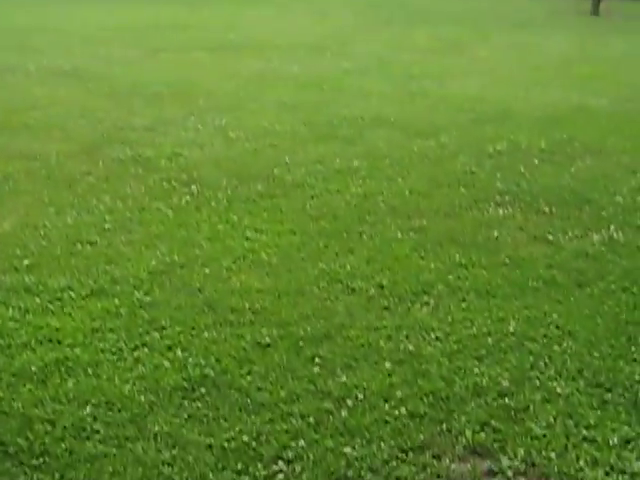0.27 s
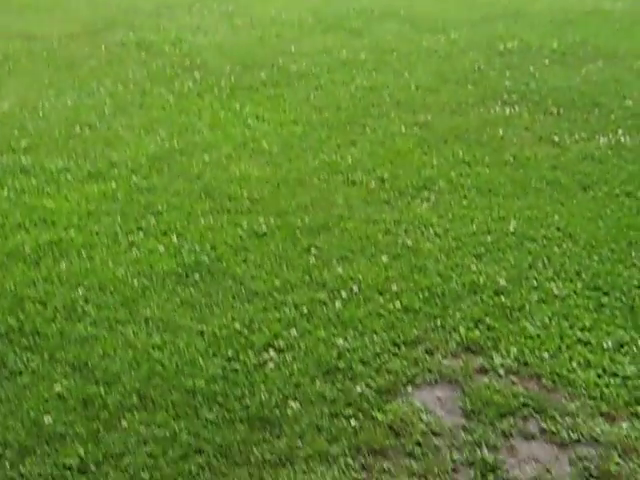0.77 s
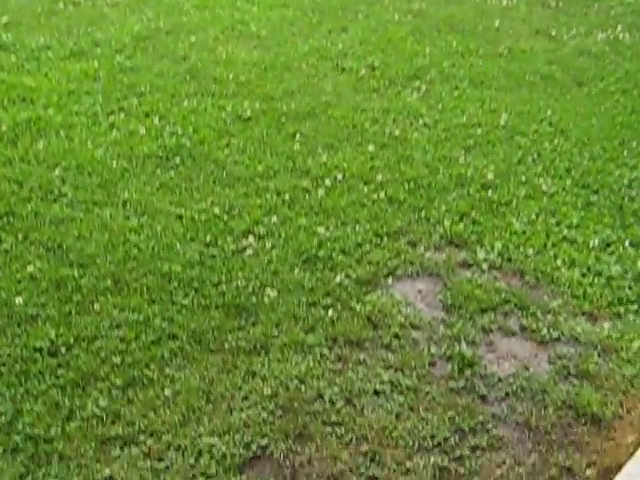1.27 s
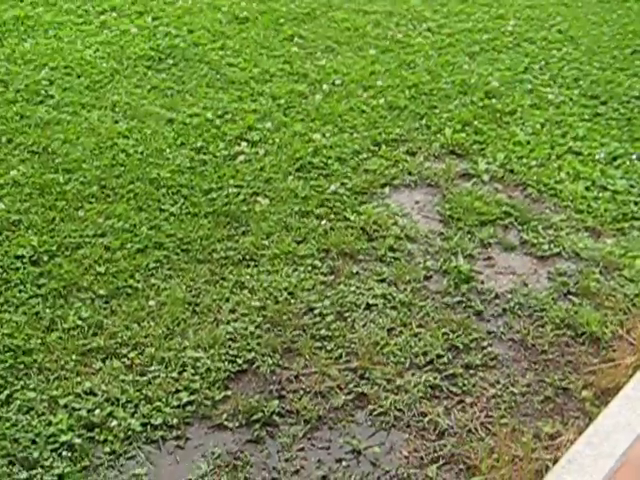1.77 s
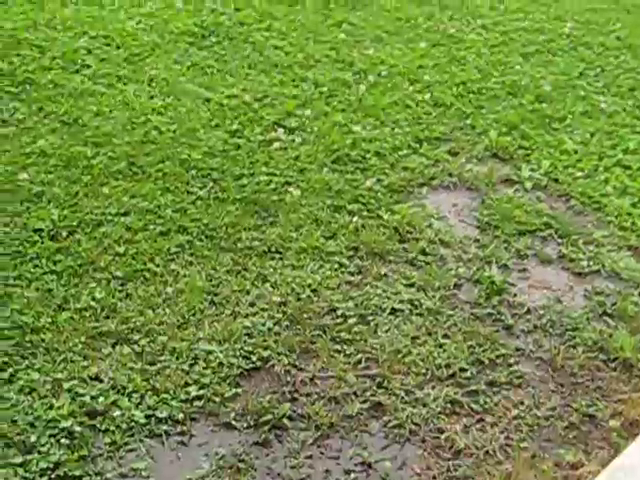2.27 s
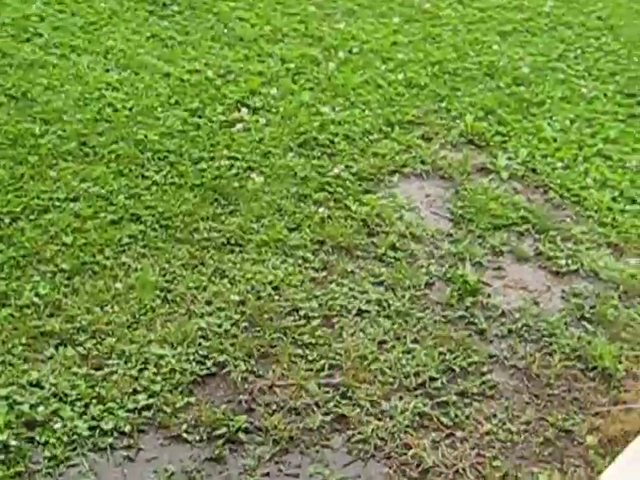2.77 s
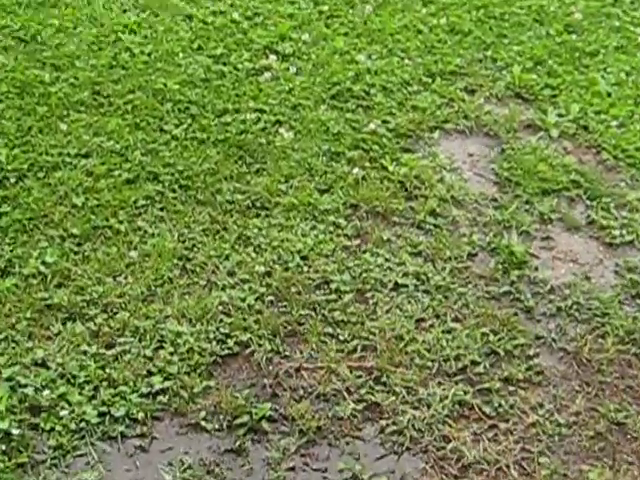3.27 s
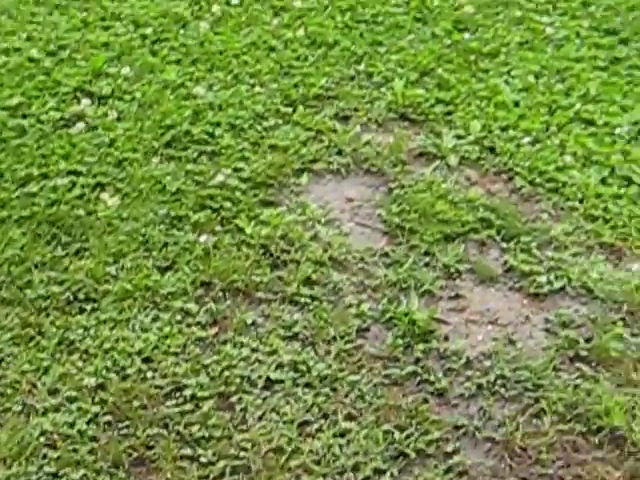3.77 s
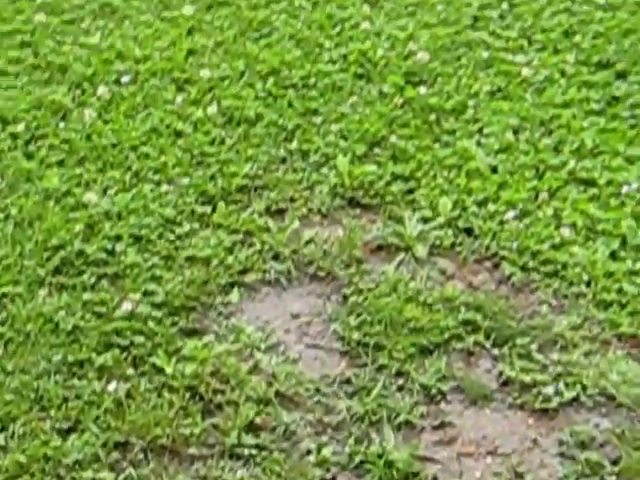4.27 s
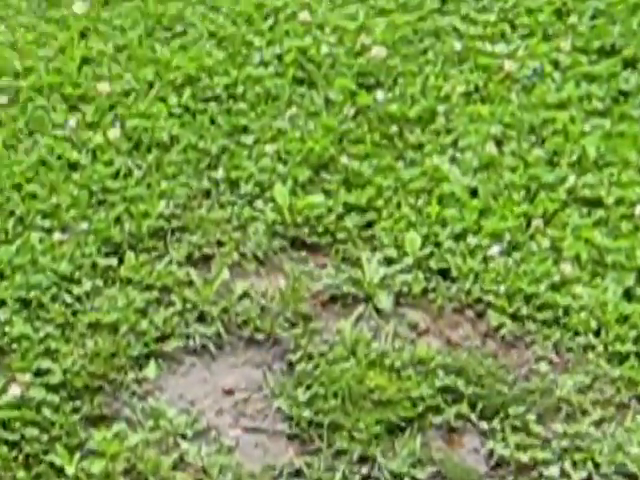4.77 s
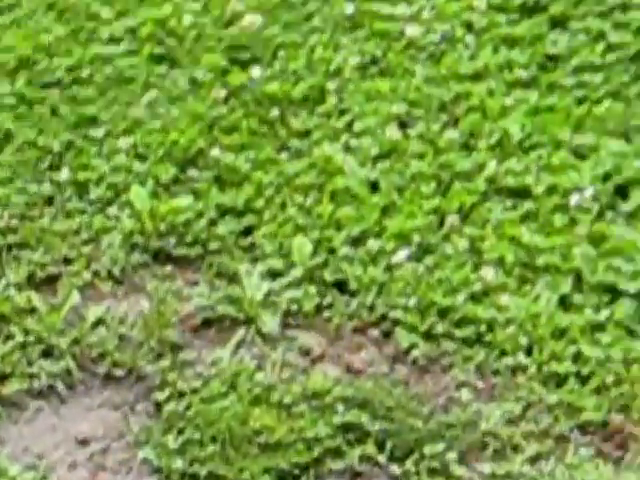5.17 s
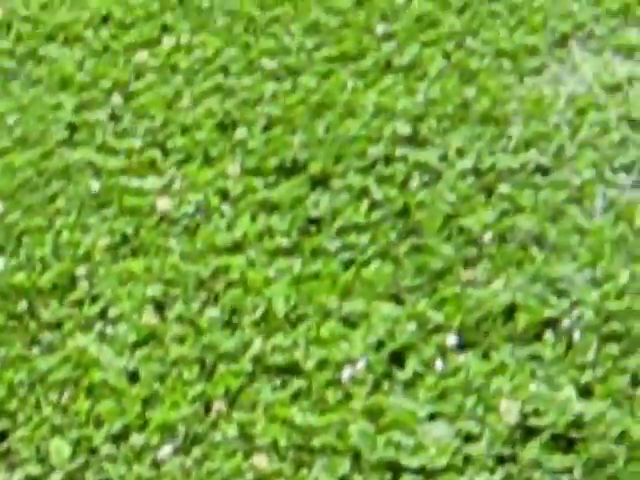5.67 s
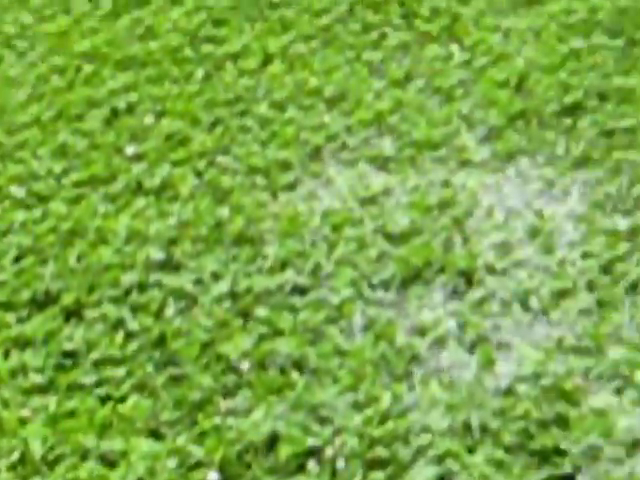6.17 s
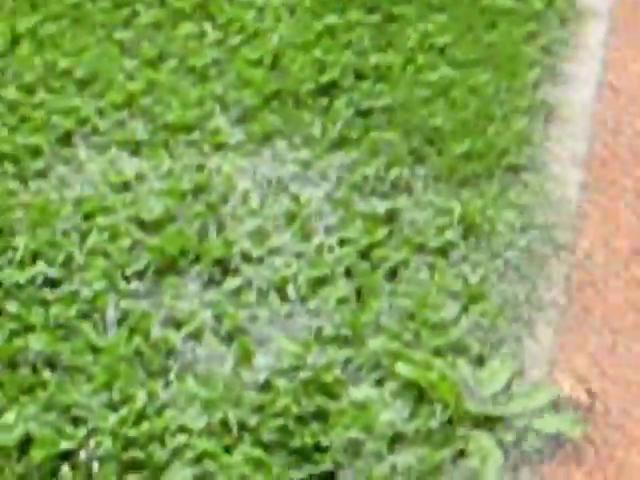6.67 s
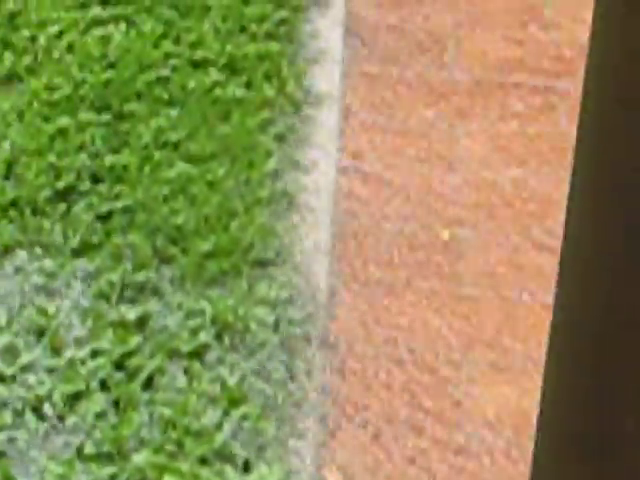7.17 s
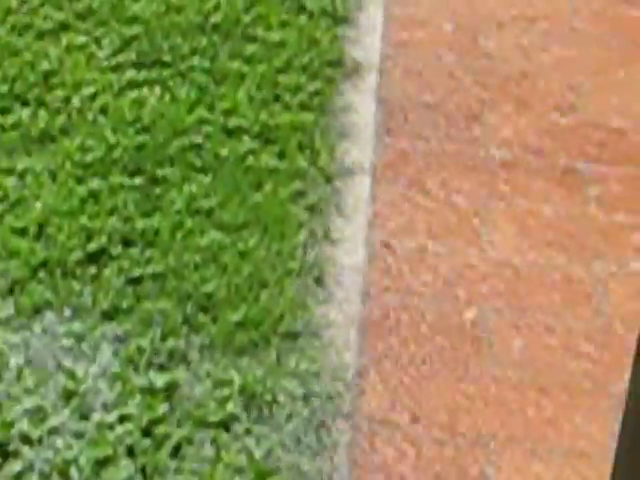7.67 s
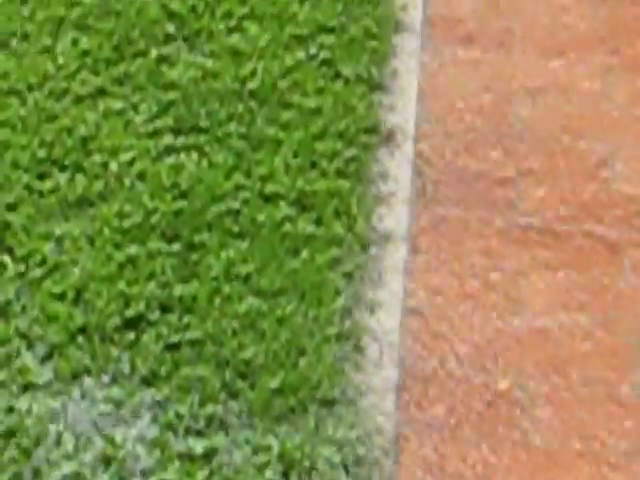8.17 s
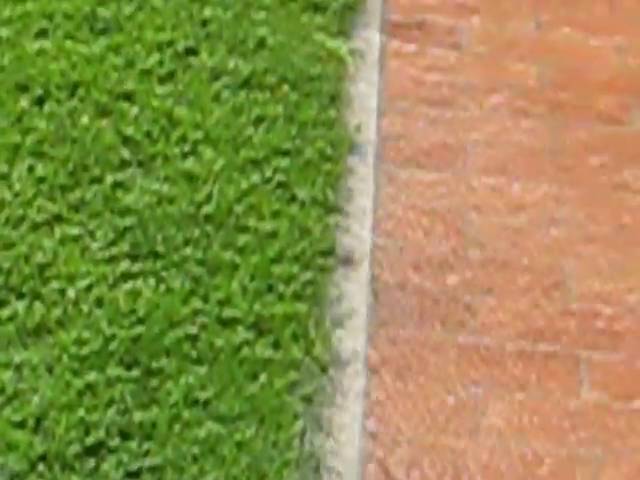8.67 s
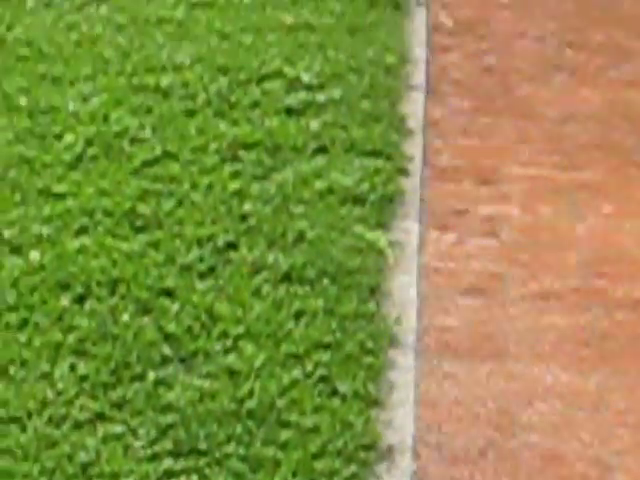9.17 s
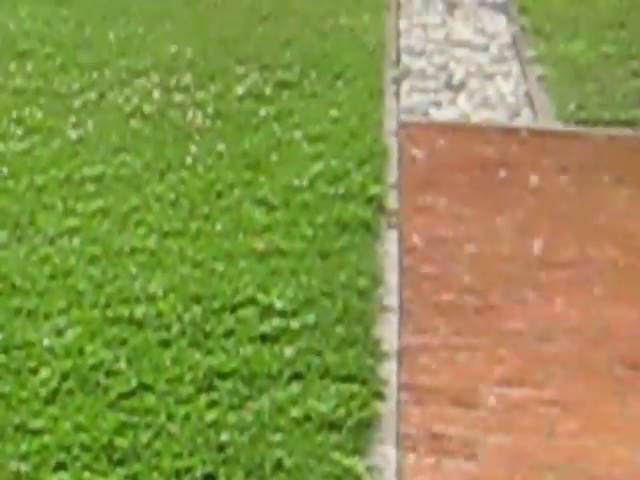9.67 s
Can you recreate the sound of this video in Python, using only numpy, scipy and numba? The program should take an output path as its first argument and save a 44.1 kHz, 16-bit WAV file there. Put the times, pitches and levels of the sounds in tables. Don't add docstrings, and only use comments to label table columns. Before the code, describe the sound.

A shower falls on a garden lawn and brick paving, heard from shelter by a small, practically mono camera microphone. Rain hiss stays continuous, gently flickering. Over it a bird repeats short, piercing chirps in runs with pauses, while scattered fat drops smack and ring and shaken leaves spit brief sprays. Near the start, sound blinks out around a small click; later, bright splashes become more frequent, with faint flickers of sideways noise.

```python
import sys
import numpy as np
from scipy import signal
from scipy.fft import rfft, irfft, next_fast_len
from scipy.io import wavfile
from scipy.ndimage import uniform_filter1d
from numba import njit

SR = 44100
rng = np.random.default_rng(int(sys.argv[2]) if len(sys.argv) > 2 else 0)


def level_to_linear(level):
    exponent = np.asarray(level, float) / 20
    return 10 ** exponent


def store_pcm(level_fs):
    pcm = np.round(np.clip(level_fs, -1, 1) * 32767).astype(np.int16)
    wavfile.write(sys.argv[1], SR, np.atleast_2d(pcm).T)


N = 437913
FFT_SIZE = next_fast_len(N)
HZ = np.arange(FFT_SIZE // 2 + 1) * SR / FFT_SIZE
TOP_HZ = 15830


def unit(x):
    return x / np.sqrt(np.mean(x ** 2))


def walk(rate_hz):
    hold = int(SR / rate_hz)
    steps = np.repeat(rng.standard_normal(N // hold + 1), hold)
    return 1.28 * uniform_filter1d(uniform_filter1d(steps, hold), hold)[:N]


def bump(centre_hz, octaves):
    return np.cos(np.pi / 2 * np.clip(np.log2((HZ + 1) / centre_hz) / octaves, -1, 1)) ** 2


def band_noise(spectrum, centre_hz, octaves):
    return irfft(spectrum * bump(centre_hz, octaves), FFT_SIZE)[:N]


def colour(hz):
    # frequency [Hz], density [dB per Hz].
    wash_shape = [(30, -29), (300, -19), (800, -14.5), (1050, -12.5), (1600, -13.5), (2150, -11.5),
                  (2850, -14), (3900, -10.5), (5300, -12), (6600, -14.5), (10000, -16), (12000, -20),
                  (14000, -27.5), (15800, -35.5)]
    shape_hz, shape_db = np.transpose(wash_shape)
    return level_to_linear(np.interp(np.log(hz + 1), np.log(shape_hz), shape_db))


@njit
def rings(at, size, hz, cycles, phase, n, sr):
    out = np.zeros(n)
    for k in range(len(at)):
        step = np.exp(complex(-np.log(1000.) / cycles[k], 2 * np.pi) * hz[k] / sr)
        z = size[k] * np.exp(1j * phase[k])
        rise = 1.
        for i in range(at[k], min(n, at[k] + int(cycles[k] * sr / hz[k]))):
            z *= step
            rise *= np.exp(-2 * hz[k] / sr)
            out[i] += (1 - rise) * z.imag
    return out


def ring_clusters(table, spread=.1, lag_cycles=.15):
    s, db, hz, cycles = np.repeat(np.array(table, float), 3, axis=0).T
    late, detune, phase = rng.random((len(s), 3)).T
    at = ((s + lag_cycles * late / hz) * SR).astype(np.int64)
    hz = np.clip(hz * (1 + spread * (2 * detune - 1)), 300, 17000)
    return rings(at, level_to_linear(db - 4), hz, np.clip(cycles, 1, 60) * 2, phase, N, 1. * SR)


def bird():
    # start [s], top of the loud partial [Hz], slide [s], level [dB], upper partial [dB].
    calls = [(-0.01, 4840, 0.06, -31.4, -4), (0.3, 4890, 0.04, -35.5, -1.8),
             (0.59, 4870, 0.035, -36.8, -3.1), (1.538, 4860, 0.055, -32.3, -9.0),
             (1.855, 4820, 0.07, -31.2, -10.2), (2.19, 4880, 0.055, -30.9, -10.0),
             (3.283, 4860, 0.05, -32, -2.5), (3.6, 4860, 0.035, -32, -4.5), (3.92, 4870, 0.05, -35.2, -1.5),
             (4.853, 4910, 0.03, -28.6, -11.5), (5.16, 4830, 0.055, -29.9, -11.4),
             (5.435, 4830, 0.03, -33.6, -4), (6.93, 4830, 0.035, -34.5, -3.7),
             (7.195, 4880, 0.035, -32.9, -7.8), (7.495, 4770, 0.03, -35.5, -5),
             (8.51, 4780, 0.03, -31.7, -8), (8.78, 4810, 0.035, -34.8, -6.5),
             (9.07, 4880, 0.04, -33.6, -9.4), (9.35, 4830, 0.03, -39, -4), (9.7, 4760, 0.025, -35.0, -7.2)]
    call_s, slide_depth = .135, .22
    echo_db, near_t60_s, far_t60_s = 4, .25, 1.4
    out = np.zeros(N + 2 * SR)
    echo_t = np.arange(SR // 2) / SR
    unsteady = 1 + .009 * walk(110)
    rasp = level_to_linear(3.5 * walk(150))
    t = np.arange(int(call_s * SR)) / SR
    swell = np.minimum(t / .02, 1) * (1 - t / call_s) ** .9 * np.minimum((call_s - t) / .03, 1)
    for s, hz, slide_s, db, upper_db in calls:
        i = int((s + 1) * SR)
        moment = i % (N - SR)
        now = slice(moment, moment + len(t))
        pitch_hz = hz * (1 - slide_depth * np.maximum(1 - t / slide_s, 0) ** 2) * unsteady[now]
        phase = 2 * np.pi * np.cumsum(pitch_hz) / SR
        decay = level_to_linear(-60 * echo_t / near_t60_s) + .36 * level_to_linear(-60 * echo_t / far_t60_s)
        echo = rng.standard_normal(len(echo_t)) * decay * (echo_t > .002)
        echo *= level_to_linear(echo_db) / np.sqrt(np.sum(echo ** 2))
        echo[0] = 1
        for order, gain_db in ((1, db), (3 / 2, db + 1.3 * upper_db)):
            heard = signal.fftconvolve(swell * rasp[now] * np.sin(order * phase), echo)
            out[i:i + len(heard)] += level_to_linear(gain_db) * heard / np.std(heard[:len(t)])
    return out[SR:SR + N]


def leaf_sprays():
    # start [s], length [s], centre [Hz], level [dB].
    bursts = [
        (2.64, 0.05, 8500, -26.5),
        (5.874, .03, 4000, -29),
        (6.425, .04, 10500, -32),
        (8.203, 0.031, 9000, -31),
        (8.403, 0.036, 9900, -28),
        (9.382, .04, 10500, -35),
    ]
    out, t = np.zeros(N), np.arange(N) / SR
    for s, length_s, hz, db in bursts:
        hiss = unit(band_noise(rfft(rng.standard_normal(N), FFT_SIZE), hz, 0.68))
        swell = np.sin(np.pi * np.clip((t - s) / length_s, 0, 1) ** 0.68)
        out += level_to_linear(db) * hiss * swell
    return out


def drips():
    # start [s], peak [dB], ring [Hz], length [cycles].
    dull_drips = [(1.241, -18, 1140, 4.0), (1.446, -22.5, 1640, 27), (2.922, -14, 1900, 4.4),
                  (3.2612, -24, 1090, 8.3), (3.2603, -12, 4100, 5.3), (3.2963, -9.5, 1790, 5.6),
                  (4.677, -21, 1150, 4.0), (5.4375, -18, 1290, 5.0), (5.8736, -11, 3600, 6.0),
                  (8.0001, -17, 8300, 7.0), (5.8738, -14, 5400, 8.0), (6.079, -13, 3800, 6.0),
                  (7.9155, -11, 3700, 6.0), (4.835, -24, 2030, 28), (5.722, -24, 1960, 4.0),
                  (5.877, -12, 4000, 6.0), (7.153, -19, 2130, 4.0), (7.898, -22, 1290, 4.0),
                  (8.076, -16, 2270, 4.4)]
    return ring_clusters(dull_drips)


def splashes():
    # start [s], level [dB], centre [Hz].
    fat_drops = [(1.241, -23, 5000), (2.2783, -21, 11000), (2.6407, -21, 7900), (2.6534, -24, 8900),
                 (2.662, -22, 10000), (2.7971, -20, 7600), (3.2245, -19, 7800), (3.2611, -11, 2500),
                 (3.2975, -16, 2300), (3.4024, -19, 7200), (3.634, -15, 4500), (4.1224, -15, 6700),
                 (4.6783, -21, 1700), (4.7797, -23, 7600), (5.8747, -13.5, 5200), (5.8901, -19, 3900),
                 (5.8955, -18, 6900), (6.6779, -17, 11800), (7.0293, -21, 8600), (7.2711, -20, 9500),
                 (7.5006, -19, 10500), (7.916, -20, 5300), (8.0005, -16, 9400), (8.0217, -13, 13000),
                 (8.242, -19, 9000), (8.5346, -18, 8600), (8.5884, -14, 11500), (9.05, -20, 2600),
                 (9.1059, -16, 12800), (9.3907, -19, 8400)]
    # start [s], level [dB].
    fine_drops = [(0.3826, -30), (0.7893, -27), (0.9119, -29), (1.0451, -25), (1.4634, -22), (1.6033, -24),
                  (2.7481, -26), (3.0554, -27), (3.5995, -21), (4.439, -20), (4.9805, -22), (5.0043, -25),
                  (5.3913, -19), (5.4788, -24), (5.6125, -22), (5.8405, -21), (6.0463, -19), (6.0568, -21),
                  (6.0976, -23), (6.7536, -23), (6.8983, -24), (7.0801, -18), (8.204, -26), (8.2202, -25),
                  (8.4873, -23), (8.6877, -26), (8.7175, -25), (9.2929, -21), (9.5191, -20), (9.7437, -22)]
    rise_s, fall_s = .0002, .0007
    stray_count, stray_db, stray_spread_db = 30, -30, 2.5
    fine_hz, fine_spread_hz, fine_width_hz = 14000, 1100, 5600
    t = (np.arange(512) - 128) / SR
    hz = np.arange(257) * SR / 512
    shape = np.exp(np.minimum(t / rise_s, -t / fall_s))
    bursts = [(s, db, f, 2300 + .22 * f) for s, db, f in fat_drops]
    stray = [(.02 + u * (N / SR - .04), stray_db + stray_spread_db * (2 * v - 1))
             for u, v in rng.random((stray_count, 2))]
    for s, db in list(fine_drops) + stray:
        bursts.append((s, db, fine_hz + fine_spread_hz * rng.standard_normal(), fine_width_hz))
    out = np.zeros(N)
    for s, db, centre_hz, width_hz in bursts:
        noise = rng.standard_normal(512)
        band = np.exp(-((hz - centre_hz) / (0.89 * width_hz)) ** 2)
        burst = irfft(rfft(noise * shape) * colour(hz) * band)
        i = int(s * SR) - 140
        out[i:i + 512] += level_to_linear(db + 2.5) * burst / np.sqrt(np.sum(burst ** 2) / 24)
    return out


def patter(count, low_hz, high_hz, cycles, scatter_db):
    when, pitch, far, phase = rng.random((count, 4)).T
    hz = low_hz + (high_hz - low_hz) * pitch
    size = level_to_linear(-scatter_db * np.log(np.maximum(far, 1 / 30))) * np.sqrt(hz)
    at = (when * N).astype(np.int64)
    return unit(rings(at, size, hz, np.full(count, cycles), 2 * np.pi * phase, N, 1. * SR))


def rain():
    # time [s], turn of the camera from lawn to paving [0-1].
    camera_turn = [
        (0, 0.15),
        (2.0, 0.2),
        (4.0, .5),
        (5.0, .5),
        (6.0, 0.77),
        (8.0, 1),
        (8.6, 0.8),
        (9.3, 1),
        (9.93, 0.8),
    ]
    rain_db, tilt_hz = -26.5, 6700
    turn = np.interp(np.arange(N) / SR, *np.transpose(camera_turn)) - .5
    level_db, treble_db = -2 * turn, 6 * turn
    grass = level_to_linear(-12.5) * patter(count=9000, low_hz=685.0, high_hz=6850.0, cycles=3.0, scatter_db=3.0)
    paving = level_to_linear(-10.0) * patter(count=6000, low_hz=6000., high_hz=17100.0, cycles=5.9, scatter_db=5.0)
    wash = rfft(rng.standard_normal(N) + grass + paving, FFT_SIZE) * colour(HZ)
    out, gust = 0, walk(9)
    for hz in 16 * 2 ** np.arange(0, 10.6, .5):
        bright = 1 / (1 + (tilt_hz / hz) ** 4)
        db = level_db + bright * treble_db + (0.46 + 0.36 * bright) * gust + 0.61 * walk(12)
        out = out + level_to_linear(db) * band_noise(wash, hz, .5)
    return level_to_linear(rain_db) * unit(out)


def scene():
    mono = bird() + leaf_sprays() + drips() + splashes() + rain()
    return np.array([mono, mono])


def camera_click():
    # start [s], peak [dB], ring [Hz], length [cycles].
    click_parts = [
        (1.3388, -35, 8600, 14.0),
        (1.3418, -15, 11000, 9.0),
        (1.3432, -26, 9000, 16.0),
        (1.343, -30, 5900, 12),
        (1.3425, -39, 1100, 5.0),
    ]
    return ring_clusters(click_parts)


def band_fill(mid):
    fill_s = [.302, .721, 1.531, 1.998, 2.417, 2.484, 3.507, 4.271, 4.39, 4.598, 4.644, 5.409, 5.505, 6.225,
              6.338, 6.503, 7.338, 7.619, 8.29, 8.847, 9.358, 9.662]
    frame, grid = 1024, 51
    lowest_hz, highest_hz, width = 4200, 13500, .2
    side, n = np.zeros(N), np.arange(2 * frame)
    window = np.sin(np.pi * (n + .5) / (2 * frame))
    chance = rng.random((len(fill_s), 2, 2))
    chance[:, 0, 1] = 0
    for s, (u, skip) in zip(np.repeat(fill_s, 2), chance.reshape(-1, 2)):
        if skip > .5:
            continue
        low_hz = lowest_hz * (highest_hz / lowest_hz) ** u
        high_hz = min(low_hz * (1 + width), TOP_HZ)
        i = grid + frame * (round((s * SR - grid) / frame) - 1)
        k = np.arange(round(low_hz * 2 * frame / SR), round(high_hz * 2 * frame / SR))
        basis = window * np.cos(np.pi / frame * np.outer(k + .5, n + .5 + frame / 2))
        size = np.sqrt(np.mean((basis @ mid[i:i + 2 * frame]) ** 2))
        side[i:i + 2 * frame] += size * rng.standard_normal(len(k)) @ basis * 2 / frame
    return level_to_linear(-1.0) * side


def top_cut(x):
    return signal.sosfilt(signal.butter(12, 16250, fs=SR, output="sos"), x)


def record(dry):
    mute_start_s, mute_end_s, mute_db = 1.3277, 1.3615, -36
    corners_s = [mute_start_s - .0003, mute_start_s, mute_end_s, mute_end_s + 0.00043]
    gate_db = np.interp(np.arange(N) / SR, corners_s, [0, mute_db, mute_db, 0])
    muted = dry[0] * level_to_linear(gate_db) + camera_click()
    mid = irfft(rfft(muted, FFT_SIZE) * (HZ < TOP_HZ), FFT_SIZE)[:N]
    side = band_fill(mid)
    return top_cut(np.array([mid + side, mid - side]))


dry = scene()
out = record(dry)
store_pcm(out)
```